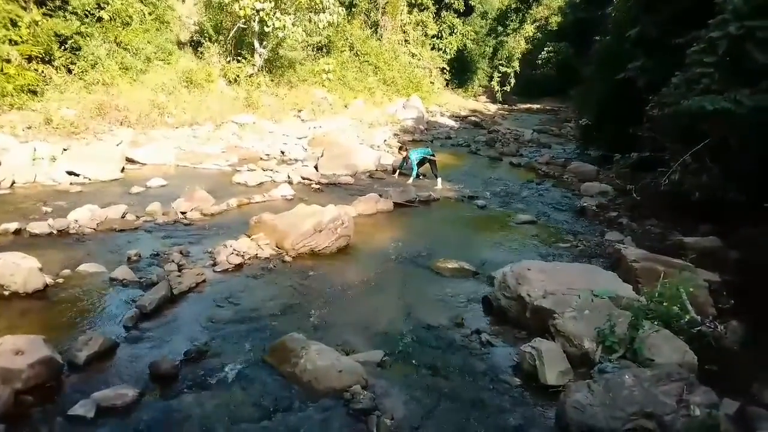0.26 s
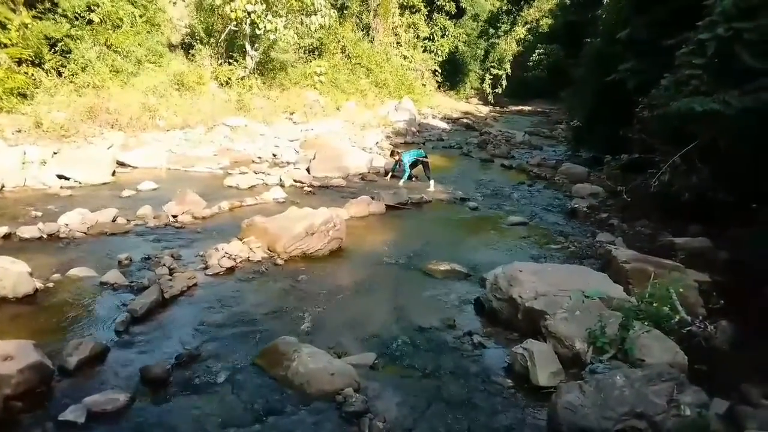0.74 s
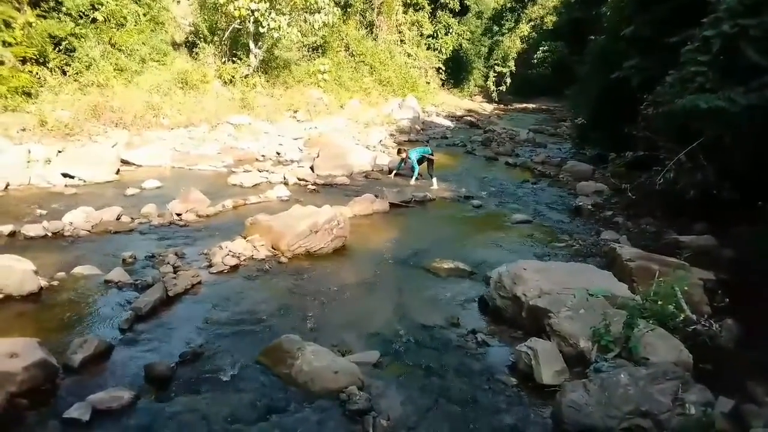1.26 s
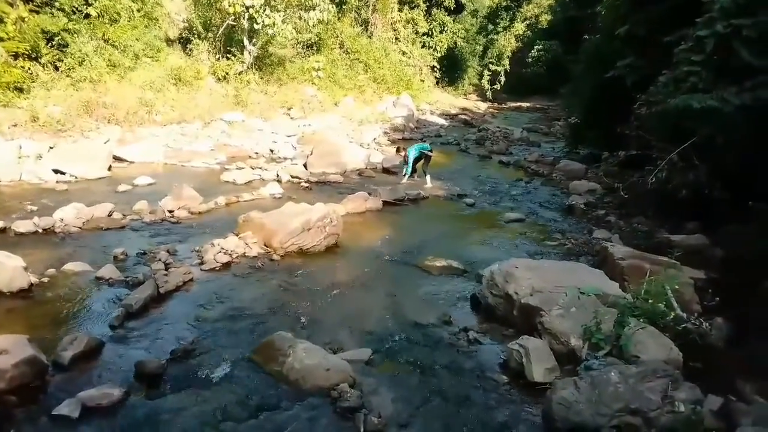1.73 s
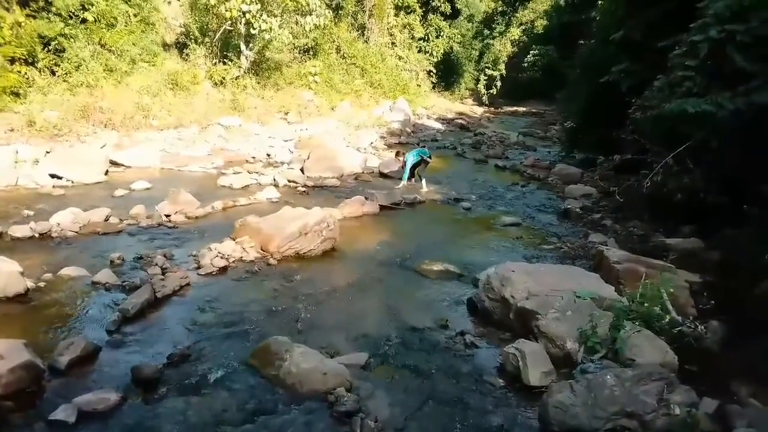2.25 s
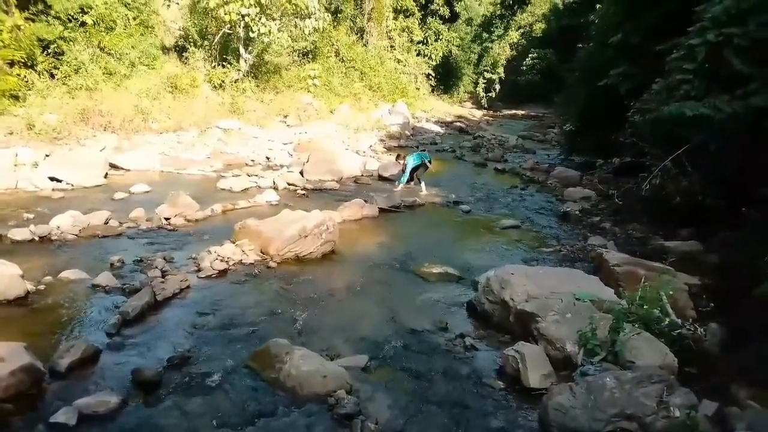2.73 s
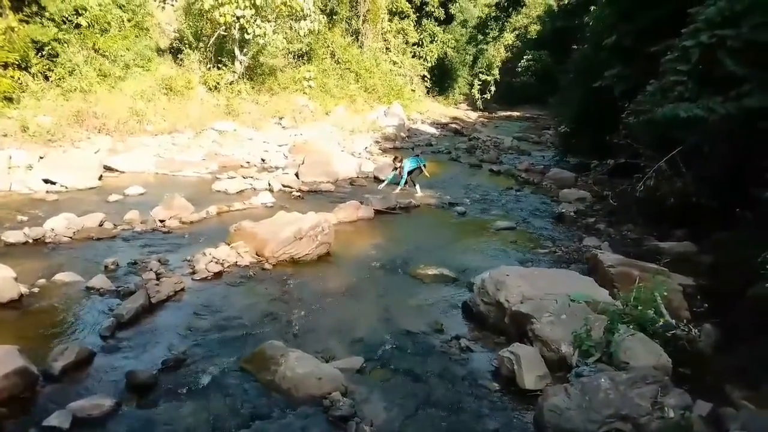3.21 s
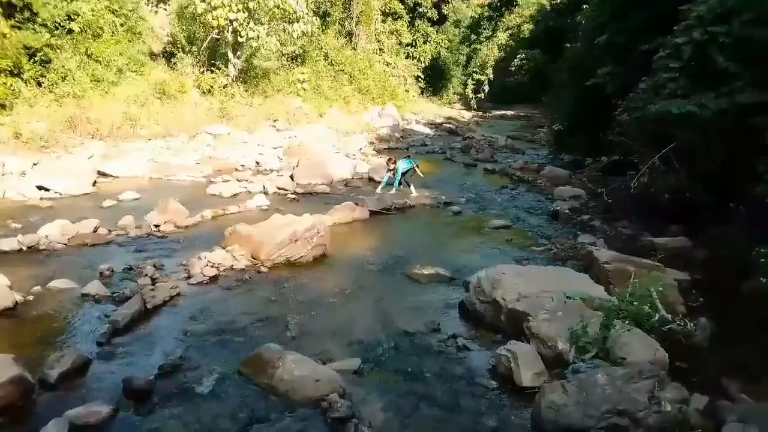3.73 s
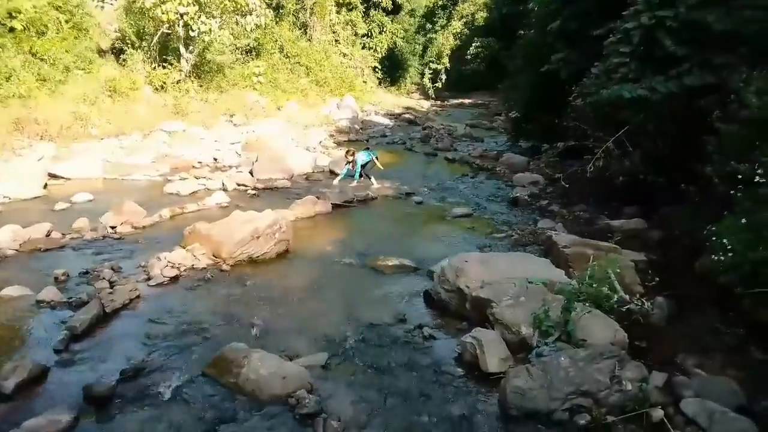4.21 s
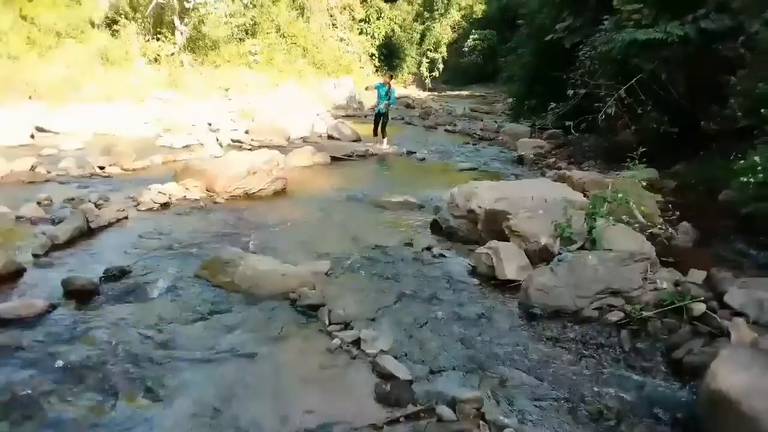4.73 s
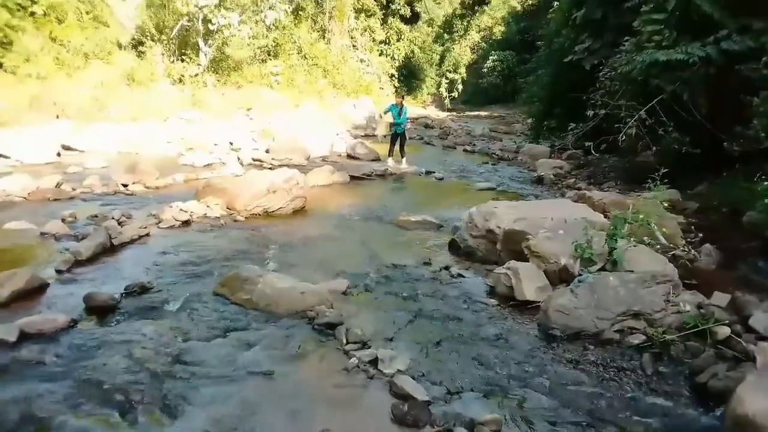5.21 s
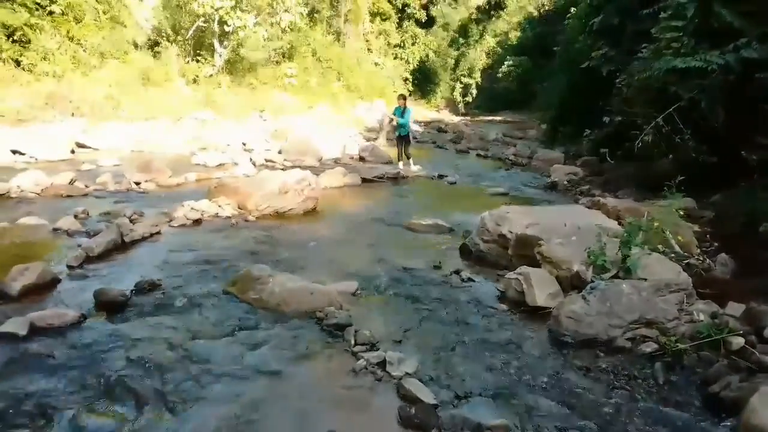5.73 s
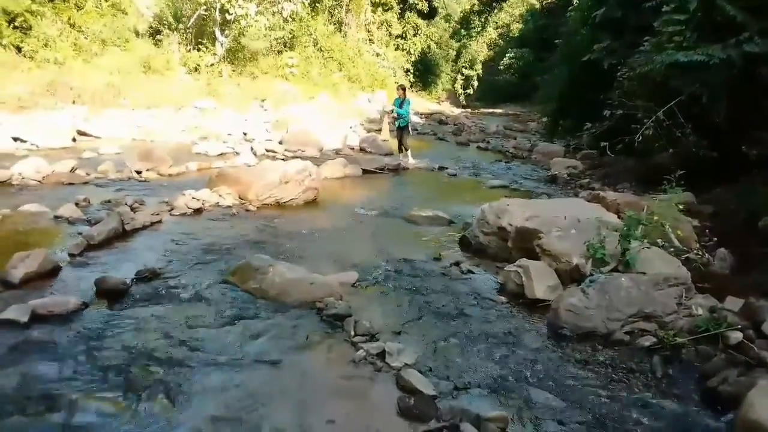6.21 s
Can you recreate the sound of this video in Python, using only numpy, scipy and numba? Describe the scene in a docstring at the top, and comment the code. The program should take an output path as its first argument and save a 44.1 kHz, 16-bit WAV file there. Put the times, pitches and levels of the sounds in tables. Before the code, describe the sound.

A shallow stream flows over stones in a forest throughout, about 6.5 seconds. Countless tiny bubbles make a dense, bright babble over a steady, blurred rush, strongest in the upper mids, with a light low gurgle. Separate plops with rising pitch pop out irregularly, low and round or high and glassy, with small dry ticks near 0.4, 3.7 and 3.9 s. A brief gush swells at 0.7 to 1 s. From about 2.4 to 3 s the water sounds slightly hollow, as if echoed by a near rock. Around 4.3 s the flow begins to grow. At 4.7 s comes a sharp, loud, very short pop, then at 4.85 s a stone-like knock with a brief ring. The water stays louder and more gurgling, with more frequent plops and a bright tick around 6.36 s. Near pickup, thinned bass, dulled treble, very faint hiss and low rumble.

```python
"""Forest, a shallow stream over stones: air bubbles ring in swarms over the blurred rush of farther water.
Each bubble is a damped sine of rising pitch; the rush is noise in third-octave bands.
Plops, a stone-like knock, a sharp pop, bright ticks and flecks of spray stand out over hiss, hum and rumble.
A near rock's echo hollows the swarm and rush; a noise suppressor with wandering edges thins their bass
and most above 5 kHz."""
import sys
import numpy as np
from scipy import signal
from scipy.fft import rfft, irfft
from scipy.io import wavfile
from numba import njit

SR = 44100
rng = np.random.default_rng(int(sys.argv[2]) if len(sys.argv) > 2 else 0)


def file_out(sig):
    """Save sig as 16-bit WAV at sys.argv[1]."""
    # one column per channel
    cols = np.atleast_2d(sig).T
    # limit, then scale
    lim = np.clip(cols, -1, 1)
    pcm = np.round(lim * 32767).astype(np.int16)
    wavfile.write(sys.argv[1], SR, pcm)


N = 284886

BUBBLES_PER_S, BUBBLE_LOW_HZ, BUBBLE_HIGH_HZ = 7000, 200, 15500
BUBBLE_T60_CYCLES = 25.6          # nominal, varied per bubble
MEAN_RISE_PER_CYCLE = 0.00413     # fraction of pitch, at 2 kHz
SIZE_SPREAD_DB, SWARM_DB = 2.5, -5


def swarm():
    """Bubbles of every size ring as damped sines, born at random, in clumps of level; small ones are commoner."""
    draw = rng.random((200000, 6))
    t_s = np.cumsum(-np.log(1 - draw[:, 0])) / BUBBLES_PER_S
    draw, t_s = draw[t_s < N / SR], t_s[t_s < N / SR]
    start = (t_s * SR).astype(np.int64)
    low, high = BUBBLE_LOW_HZ ** .75, BUBBLE_HIGH_HZ ** .75
    hz = (low + (high - low) * draw[:, 1]) ** (4 / 3)
    # from mere clicks to clear notes; big ones ring on
    t60_cycles = BUBBLE_T60_CYCLES * (0.25 + 1.67 * draw[:, 2])
    t60_s = t60_cycles / hz * (1 + 0.3 / (1 + (hz / 700) ** 2))
    spread_db = SIZE_SPREAD_DB * (hz / 1000) ** -.06   # big bubbles differ more in strength
    size_db = spread_db * (-np.log(1 - .95 * draw[:, 3]) - 1)
    clump_db = 1.25 * drift(8.6)[start] + 0.85 * drift(42.0)[start] + 1.13 * drift(130.0)[start]
    # third-octave power = height squared * ring time * births per second in it
    births_per_s = BUBBLES_PER_S * hz ** .75 * np.log(2) / 4 / (high - low)
    crowd = np.sqrt(births_per_s * BUBBLE_T60_CYCLES / hz / (4 * np.log(1000)))
    near_db = 0.58 * np.maximum(np.log2(1200 / hz), 0)   # the low gurgle is mostly near water
    level_db = SWARM_DB + near_db + water_db(t_s, hz) + size_db + clump_db
    height = from_db(level_db) / crowd * np.sign(draw[:, 4] - .5)
    rise_per_cycle = 2 * MEAN_RISE_PER_CYCLE * draw[:, 5] * (2000 / hz) ** .8
    out = np.zeros(N)
    ring_damped(out, start, hz, height, t60_s, rise_per_cycle, .8)
    return out


RUSH_DB = -8


def rush(patchy_db):
    """Far water has blurred into noise; each third octave wavers partly with the others."""
    out, together, t_s = 0, drift(1.8), np.arange(N) / SR
    edges_hz = 140 * 2 ** (np.arange(22) / 3)
    white = rng.standard_normal((2, N))   # neighbouring bands get unrelated noise
    for k, (low_hz, high_hz) in enumerate(zip(edges_hz, edges_hz[1:])):
        band = bandpass(white[k % 2], 3, low_hz, high_hz)
        waver_db = patchy_db * (.5 * together + drift(7.2))
        thin_db = -3.0 * max(np.log2(1200 / low_hz), 0)   # little of the low gurgle comes from afar
        level_db = RUSH_DB + thin_db + water_db(t_s, np.sqrt(low_hz * high_hz)) + waver_db
        out = out + from_db(level_db) * rms_one(band)
    return out


# flow: t/s, fizz level/dB, low-gurgle rise/dB
FLOW = [(0, -36.5, 3), (.45, -38, 0.5), (.9, -37, 4), (1.6, -38.5, -1.5), (2.05, -38, 1.5), (2.6, -39, -1),
        (3.2, -38, 0.5), (3.8, -38, 0), (4.1, -36, -1), (4.35, -35, 0.5), (4.65, -32.5, 2), (5.4, -33, 4.5),
        (5.9, -34.5, 0.5), (6.2, -32, 3.5), (6.46, -35, 1)]
# calm-water colour: f/Hz, third-octave level/dB before source gains
WATER = [(250, -59.5), (340, -48.5), (450, -49.5), (630, -50.5), (870, -43), (1250, -47), (1700, -45.5),
         (2100, -42.5), (2700, -37), (3500, -39.5), (4700, -37), (6000, -35.5), (8000, -68), (10500, -55.5),
         (15000, -55)]
# share of the fizz swell followed: f/Hz, share/1
FOLLOWS = [(400, -0.038), (900, -0.12), (1400, 0.89), (2100, 0.52), (3500, 1.26), (7000, -0.22),
           (12000, -0.71)]
# gushes, brief level changes about one pitch: start t/s, length/s, f/Hz, rise/dB
GUSHES = [(0.71, 0.274, 1900, 6.5), (1.832, .35, 1680, 1.5), (3.95, .22, 2720, 1.5),
          (4.555, .4, 1410, -0.5), (6.097, 0.18, 1170, 1.5)]
CALM_DB, GURGLE_TOP_HZ = -38, 800   # fizz at zero swell; gurgle fades out about here
GUSH_EDGE_S, GUSH_OCTAVES = 0.023, 0.47


def water_db(t_s, hz):
    """Third-octave level of the flow at hz: calm colour plus swells of fizz and gurgle, plus gushes."""
    times_s, fizz_db, gurgle_db = np.transpose(FLOW)
    fizz_swell_db = at_hz(FOLLOWS, hz) * (np.interp(t_s, times_s, fizz_db) - CALM_DB)
    gurgle_swell_db = np.interp(t_s, times_s, gurgle_db) / (1 + (hz / GURGLE_TOP_HZ) ** 4)
    gush_db = 0
    for start_s, length_s, centre_hz, rise_db in GUSHES:
        inside_s = np.minimum(t_s - start_s, start_s + length_s - t_s)
        gate = np.clip(inside_s / GUSH_EDGE_S + .5, 0, 1)
        gush_db = gush_db + rise_db * gate * np.exp(-(np.log2(hz / centre_hz) / GUSH_OCTAVES) ** 2)
    return at_hz(WATER, hz) + fizz_swell_db + gurgle_swell_db + gush_db


# single bubbles, and a stone-like knock of several modes near 4.847 s:
# t/s, f/Hz, nominal peak level/dB, ring to -60 dB/cycles
PLOPS_AND_KNOCK = [(0.0277, 4020, -27, 38), (0.233, 334, -40, 55), (0.2956, 368, -39.5, 48),
                   (0.3083, 575, -36, 24), (0.472, 4700, -26, 52), (0.5363, 726, -36, 60),
                   (0.5947, 3360, -23.5, 45), (0.681, 2790, -23, 54), (0.6857, 1430, -29.5, 52),
                   (0.9606, 402, -40, 68), (1.191, 1390, -33, 57), (1.2355, 4540, -27, 130),
                   (1.2841, 2960, -30, 56), (1.2954, 4200, -26, 68), (1.3085, 4620, -28, 90),
                   (1.3115, 1420, -32, 43), (1.7827, 514, -32.5, 120), (1.8278, 638, -36, 75),
                   (2.206, 4800, -25, 53), (2.2236, 4550, -23, 73), (2.232, 2860, -24, 49),
                   (2.311, 1850, -31.5, 72), (2.3402, 3500, -25.5, 60), (2.431, 1090, -33, 48),
                   (2.4982, 2490, -23.5, 33), (2.5008, 593, -40, 51), (2.5784, 1190, -35, 60),
                   (2.7233, 660, -30.5, 24), (2.9643, 574, -34.5, 44), (3.223, 2600, -23, 47),
                   (3.3766, 2840, -26, 54), (3.429, 4320, -26, 90), (3.4502, 3350, -21, 50),
                   (3.6632, 4370, -20, 36), (3.738, 423, -39, 33), (3.8534, 4520, -20, 36),
                   (4.2533, 1500, -31, 56), (4.5542, 460, -35, 37), (4.5968, 4720, -24, 85),
                   (4.6082, 1250, -26, 40), (4.7208, 3950, -23, 73), (4.7357, 3000, -25, 66),
                   (4.8465, 4500, -22, 60), (4.8468, 1890, -32, 20), (4.8461, 434, -36.5, 40),
                   (4.847, 2460, -20, 240), (4.8487, 1280, -22, 17), (4.892, 1640, -26.5, 59),
                   (4.8942, 2770, -21.5, 44), (5.1144, 1320, -29.5, 60), (5.2775, 4560, -23, 66),
                   (5.374, 853, -31.5, 70), (5.553, 257, -43, 52), (5.628, 5070, -23, 50),
                   (5.6861, 837, -25.5, 29), (5.7327, 850, -30.5, 57), (5.805, 3350, -23.5, 100),
                   (5.889, 2910, -21, 57), (5.96, 2320, -22.5, 69), (6.0078, 950, -30, 42),
                   (6.0143, 3730, -20, 41), (6.0817, 608, -33, 38), (6.1874, 830, -30, 53),
                   (6.258, 5200, -22, 58), (6.2598, 797, -31.5, 39), (6.306, 4260, -17.5, 58)]
CLIMB_HZ, CLIMB_FALL = 244, 0.55   # approx. whole-ring climb at 1 kHz; power of its fall with pitch
PLOP_LOW_HZ, PLOP_TOP_HZ = 200, 6300


def plops_and_knock():
    """Single bubbles and the modes of a stone-like knock: damped sines of climbing pitch, band-passed."""
    t_s, hz, peak_db, cycles = np.transpose(PLOPS_AND_KNOCK)
    height = from_db(peak_db + 1.5)   # fades while it swells, so struck harder
    climb_hz = CLIMB_HZ * (hz / 1000) ** -CLIMB_FALL
    out = np.zeros(N)
    ring_damped(out, (t_s * SR).astype(np.int64), hz, height, cycles / hz, climb_hz / hz / cycles, .6)
    return bandpass(out, 4, PLOP_LOW_HZ, PLOP_TOP_HZ)


# close burst: t/s, f/Hz, envelope peak level/dB, Gaussian sigma/s
POP = (4.6993, 2350, -10.3, .00032)


def pop():
    """A burst close by: little more than one swing of a sine under a Gaussian."""
    t_s, hz, peak_db, sigma_s = POP
    since_s = np.arange(N) / SR - t_s
    return from_db(peak_db) * np.exp(-(since_s / sigma_s) ** 2 / 2) * np.sin(2 * np.pi * hz * since_s)


# bright ticks: t/s, peak level/dB, lowest f/Hz, highest f/Hz, decay/s
TICKS = [(.158, -48, 7500, 12000, .003), (.4432, -36, 6500, 17000, 0.00072),
         (0.473, -46, 5000, 11500, .0008), (1.235, -46, 5000, 7000, .002), (1.5, -46, 6500, 8000, .002),
         (3.6628, -46, 3500, 11000, .0008), (3.853, -42, 5000, 7450, 0.003),
         (4.5495, -50, 8000, 17000, .001), (6.352, -44, 9500, 17000, .005), (6.359, -33, 6500, 14500, .002),
         (6.367, -47, 6500, 13000, .005)]


def ticks():
    """Short decaying bursts of band-passed noise close to the microphone."""
    out, since_s = np.zeros(N), np.arange(2000) / SR
    for t_s, peak_db, low_hz, high_hz, decay_s in TICKS:
        noise = rng.standard_normal(len(since_s)) * np.exp(-since_s / max(decay_s, 2e-4))
        burst = bandpass(noise, 2, low_hz, high_hz)
        out[round(t_s * SR):][:len(since_s)] += from_db(peak_db) * burst / abs(burst).max()
    return out


FLECKS_PER_S, FLECK_T60_CYCLES = 40, 30
FLECK_FLOOR_DB, FLECK_SPREAD_DB = -66, 4   # floor at 6 kHz


def flecks():
    """Tiny drops of spray land at random: faint, very short damped sines above the passed band."""
    draw = rng.random((2000, 3))
    t_s = np.cumsum(-np.log(1 - draw[:, 0])) / FLECKS_PER_S
    draw, t_s = draw[t_s < N / SR], t_s[t_s < N / SR]
    hz = 5800 * 2.2 ** draw[:, 1] ** 1.4
    spread_db = -FLECK_SPREAD_DB * np.log(1 - .97 * draw[:, 2])
    height = from_db(FLECK_FLOOR_DB + spread_db - 7.0 * np.log2(hz / 6000))
    out = np.zeros(N)
    ring_damped(out, (t_s * SR).astype(np.int64), hz, height, FLECK_T60_CYCLES / hz, np.zeros(len(t_s)), 2.5)
    return out


HISS_DB, HISS_LOW_HZ, HISS_FALL_HZ = -63, 4980, 6500


def hiss():
    """A thin flickering noise above the passed band, falling with pitch."""
    high = highpass(rng.standard_normal(N), HISS_LOW_HZ)
    falling = signal.sosfilt(signal.butter(3, HISS_FALL_HZ, fs=SR, output="sos"), high)
    return from_db(HISS_DB + 1.0 * drift(14.0) + 1.0 * drift(40.0)) * rms_one(falling)


HUM_HZ, HUM_DB, HUM_WAVER_DB = 43, -91, 2.9


def hum():
    """A faint low sine of wavering level."""
    tone = np.sqrt(2) * np.sin(2 * np.pi * HUM_HZ * np.arange(N) / SR)
    return from_db(HUM_DB + HUM_WAVER_DB * drift(4.0)) * tone


RUMBLE_DB, RUMBLE_WAVER_DB = -89.5, 4.5
SWAY_DB, SWAY_RATE_HZ = -88, 9


def rumble():
    """Faint wavering low noise, plus pressure swaying below hearing."""
    noise = rms_one(bandpass(rng.standard_normal(N), 2, 85, 150))
    sway = from_db(SWAY_DB) * drift(SWAY_RATE_HZ)
    return from_db(RUMBLE_DB + RUMBLE_WAVER_DB * drift(7.5)) * noise + sway


# near-rock echo: t/s, strength/1
ROCK = [(0, 0.13), (1.9, 0.1), (2.4, 0.4), (2.75, 0.85), (3.0, 0.14), (3.35, 0.4), (3.8, .25), (4.1, 0.35),
        (4.7, 0.02), (6.46, 0.02)]
ROCK_LAG_S, ROCK_HZ, ROCK_OCTAVES = .00203, 1520, .42


def rock(x):
    """A late copy of the middle band weakens the direct sound at evenly spaced pitches."""
    hz = bin_hz()
    band = np.exp(-(np.log2(hz / ROCK_HZ) / ROCK_OCTAVES) ** 4 - 2j * np.pi * hz * ROCK_LAG_S)
    strength = np.clip(np.interp(np.arange(N) / SR, *np.transpose(ROCK)), 0, 1)
    return x + strength * irfft(rfft(x) * band, N)


# wandering passband: t/s, lower edge f/Hz, upper edge f/Hz
EDGES = [(0, 250, 5080), (.55, 260, 4920), (.85, 247, 5250), (1.2, 260, 5040), (1.45, 313, 4970),
         (1.75, 330, 4900), (1.85, 250, 5020), (2.05, 228, 5260), (2.5, 247, 5000), (3.0, 256, 5100),
         (3.3, 307, 5020), (3.6, 234, 4880), (4.1, 230, 4970), (4.35, 285, 5050), (4.65, 240, 5160),
         (6.46, 240, 5220)]
TREBLE_DB, TREBLE_LOW_HZ, TREBLE_LAG_SAMPLES = -20.5, 5700, 400   # the lag decorrelates, avoids cancellation


def suppressor(x):
    """A noise suppressor passes a band with wandering edges; a faint, slightly delayed share of treble is added."""
    t_s, low_hz, high_hz = np.transpose(EDGES)
    now_s = np.arange(N) / SR
    thinned = wander(x, np.interp(now_s, t_s, low_hz), power=-6.0, count=3)
    main = wander(thinned, np.interp(now_s, t_s, high_hz), power=34.0, count=4)
    return main + from_db(TREBLE_DB) * highpass(np.roll(x, TREBLE_LAG_SAMPLES), TREBLE_LOW_HZ)


def wander(x, edge_hz, power, count):
    """A filter of moving edge, blended from fixed ones; power < 0 is high-pass, > 0 low-pass."""
    steps_hz = np.linspace(edge_hz.min(), edge_hz.max(), count)
    place = np.interp(edge_hz, steps_hz, np.arange(count))
    hz, spectrum, out = bin_hz(), rfft(x), 0
    for k, step_hz in enumerate(steps_hz):
        share = np.clip(1 - abs(place - k), 0, 1)
        out = out + share * irfft(spectrum / (1 + (hz / step_hz) ** power), N)
    return out


@njit
def ring_damped(out, start, hz, height, t60_s, rise_per_cycle, swell_cycles):
    """Add damped sines; pitch climbs by a fraction per cycle, as a bubble's does nearing the surface."""
    for k in range(len(start)):
        phase, step = 0.0, 2 * np.pi * hz[k] / SR
        fade = 1e-3 ** (1 / (t60_s[k] * SR))
        climb = 1 + rise_per_cycle[k] * hz[k] / SR
        level, onset, grow = height[k], 1.0, np.exp(-hz[k] / SR / swell_cycles)
        for i in range(start[k], min(len(out), start[k] + int(t60_s[k] * SR))):
            out[i] += level * (1 - onset) * np.sin(phase)
            phase += step
            step = min(step * climb, 3.0)   # stays below Nyquist
            level *= fade
            onset *= grow


def drift(rate_hz):
    """Slow random wander, rms 1: noise at every 40th sample through a double one-pole low-pass."""
    r = np.exp(-80 * np.pi * rate_hz / SR)
    slow = signal.lfilter([1], [1, -2 * r, r * r], rng.standard_normal(N // 40 + 2002))[2000:]
    return np.interp(np.arange(N) / 40, np.arange(len(slow)), rms_one(slow))


def bandpass(x, order, low_hz, high_hz):
    """Butterworth band-pass."""
    return signal.sosfilt(signal.butter(order, [low_hz, high_hz], "band", fs=SR, output="sos"), x)


def highpass(x, low_hz):
    """Sixth-order Butterworth high-pass."""
    return signal.sosfilt(signal.butter(6, low_hz, "high", fs=SR, output="sos"), x)


def bin_hz():
    """Spectrum bin frequencies, offset by one bin to avoid zero."""
    return np.arange(1, N // 2 + 2) * SR / N


def at_hz(points, hz):
    """Table value at hz, interpolated over log frequency."""
    table_hz, value = np.transpose(points)
    return np.interp(np.log(hz), np.log(table_hz), value)


def from_db(db):
    """Amplitude ratio of a level in dB."""
    return 10 ** (np.asarray(db) / 20)


def rms_one(x):
    """Scale to rms 1."""
    return x / np.sqrt(np.mean(x ** 2) + 1e-20)


def scene():
    """Swarm and rush past the rock and through the suppressor; all other layers added directly."""
    water = suppressor(rock(swarm() + rush(patchy_db=1.5)))
    details = plops_and_knock() + pop() + ticks() + flecks()
    background = hiss() + hum() + rumble()
    return (water + details + background)[None]


CUTOFF_HZ = 15750


def record(dry):
    """A steep elliptic low-pass cuts the top."""
    return signal.sosfilt(signal.ellip(12, .5, 60, CUTOFF_HZ, fs=SR, output="sos"), dry)


dry = scene()
out = record(dry)
file_out(out)
```